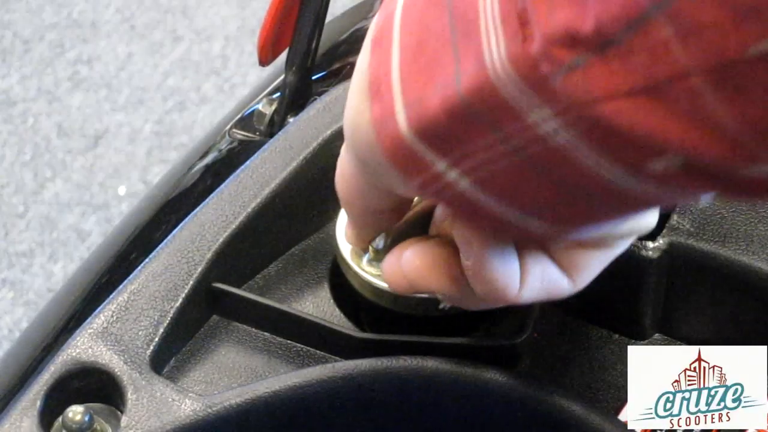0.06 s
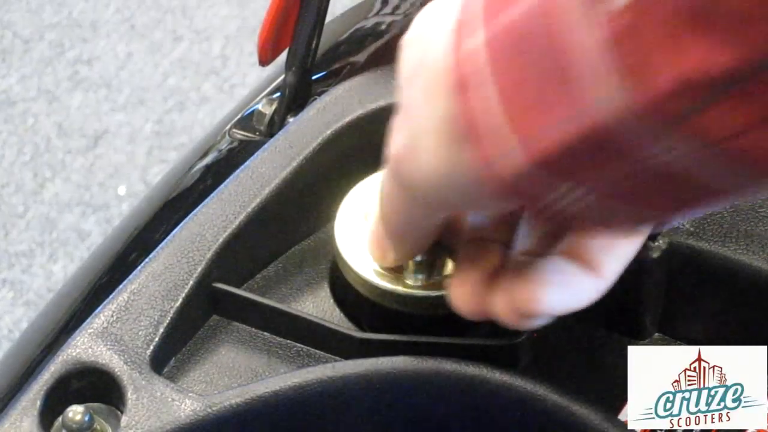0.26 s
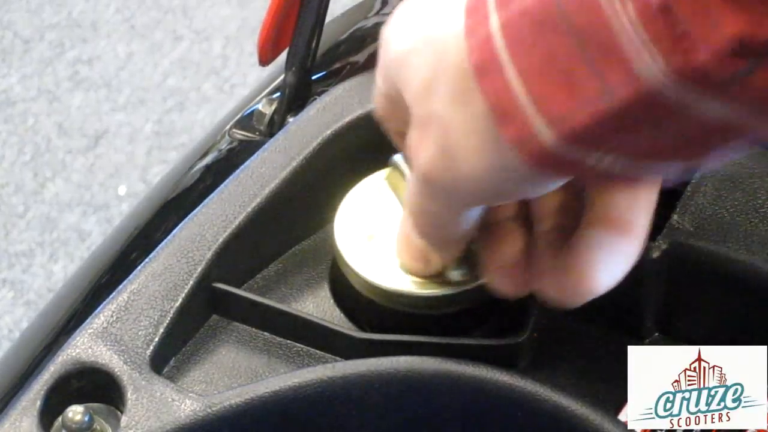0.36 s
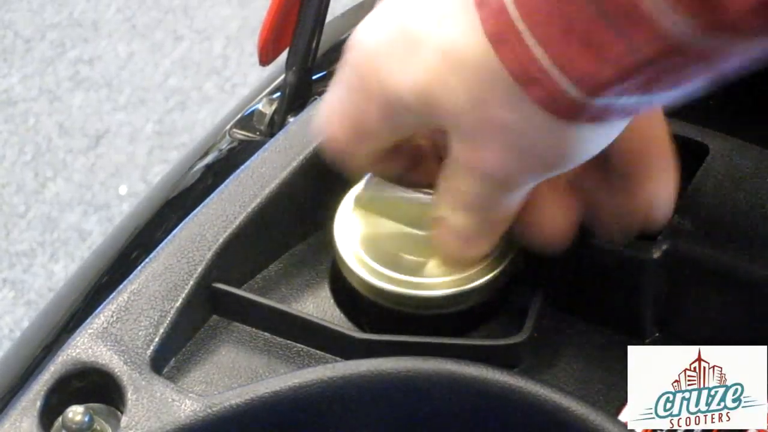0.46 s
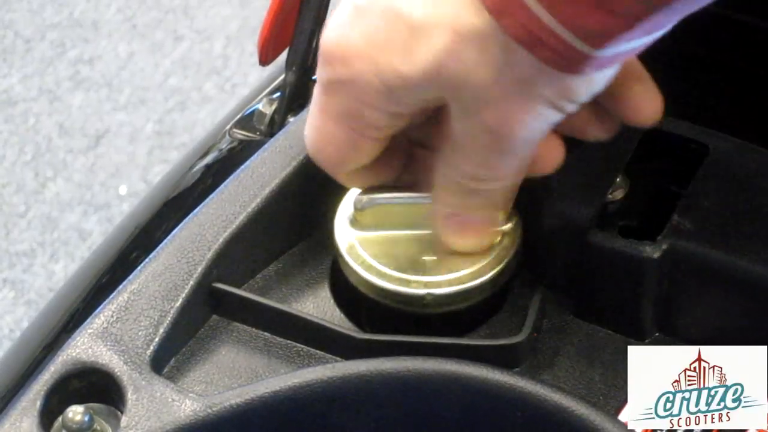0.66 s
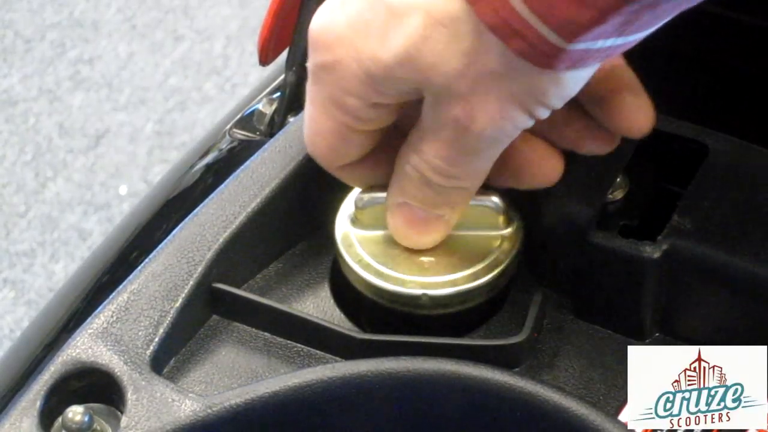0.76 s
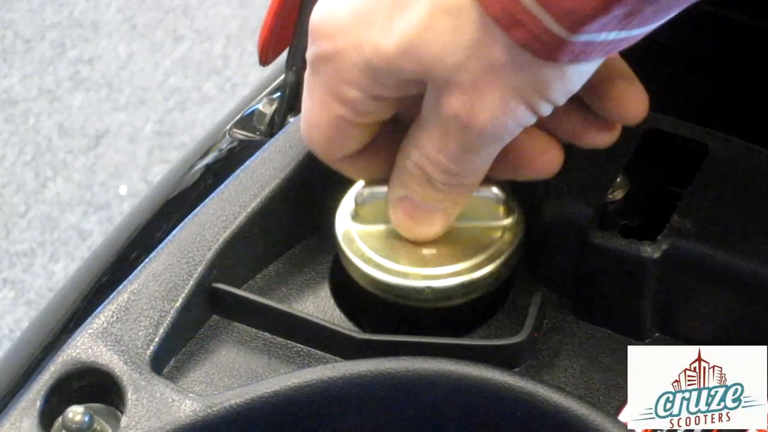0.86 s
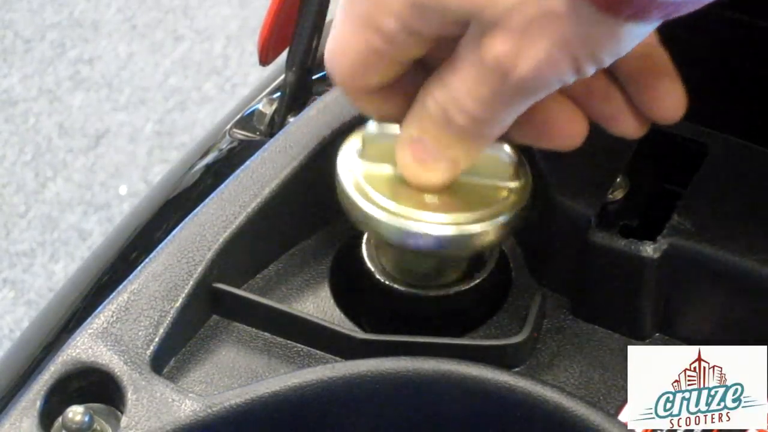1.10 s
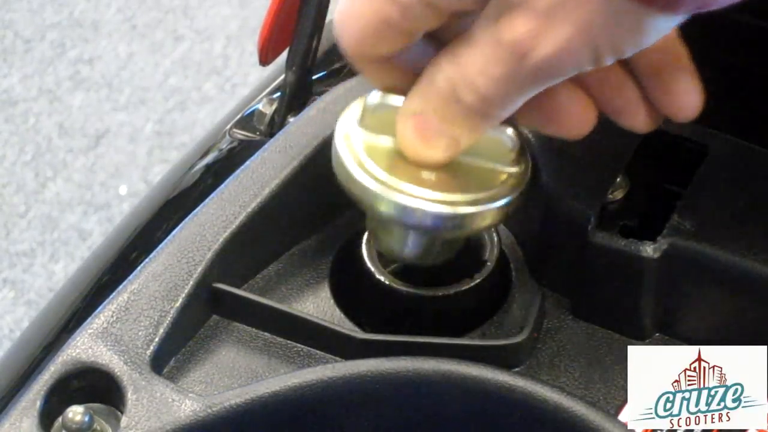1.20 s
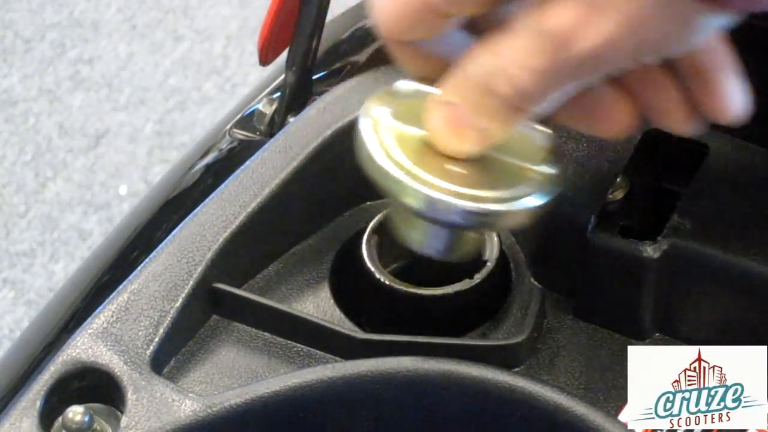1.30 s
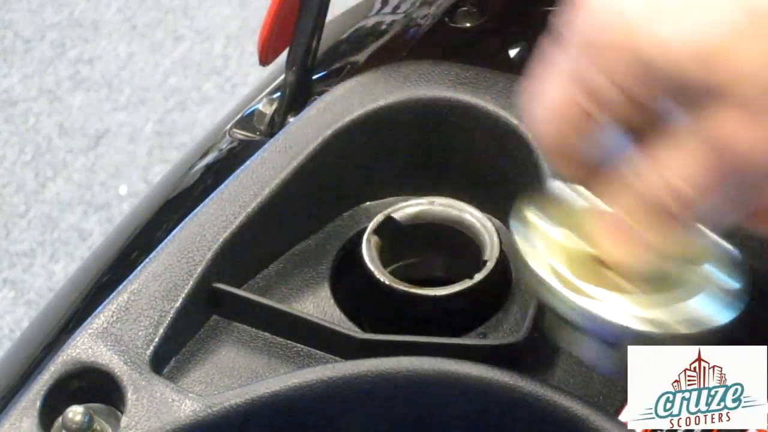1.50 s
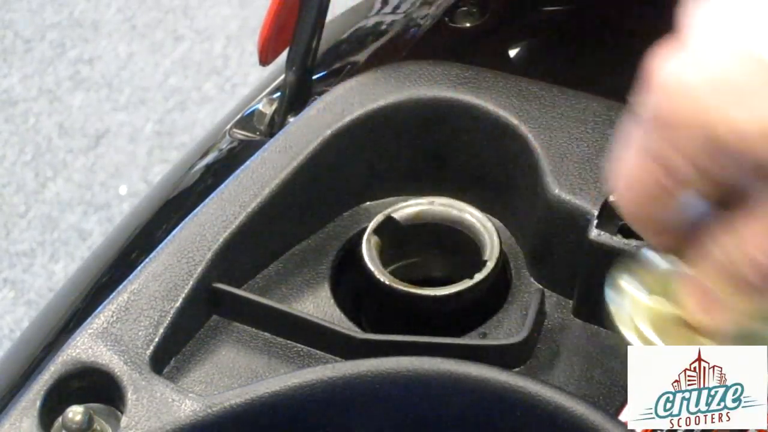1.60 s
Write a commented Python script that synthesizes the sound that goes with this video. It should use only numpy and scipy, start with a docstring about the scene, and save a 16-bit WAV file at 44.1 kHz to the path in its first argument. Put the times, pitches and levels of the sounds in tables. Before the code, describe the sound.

Faint finger rubbing, then hard metallic clicks and grinding from a twisted fuel cap with hollow tank thuds, a brief puff of air, and a ringing scrape as the cap lifts out, heard close over soft room air.

```python
"""Fingers rub faintly on a scooter's fuel cap, close to the microphone, over steady ventilation in a small room.
Then the metal cap is twisted: its lugs snap, chatter and grind round the filler neck and knock the hollow tank.
The seal lets go with a short hiss, and the cap scrapes up out of the neck, ringing more freely as it comes clear.
Blows ring sets of decaying modes or coloured noise bursts; rubbing is a stream of tiny random slips through
filters and resonances."""
import sys
import numpy as np
from scipy import signal
from scipy.fft import next_fast_len
from scipy.io import wavfile

SR = 44100
rng = np.random.default_rng(int(sys.argv[2]) if len(sys.argv) > 2 else 0)


def store_wav(level_fs):
    """Save 16-bit WAV to argv[1]."""
    pcm = np.round(np.clip(np.atleast_2d(level_fs), -1, 1) * 32767)
    wavfile.write(sys.argv[1], SR, pcm.T.astype(np.int16))


N = 72765
SECONDS = np.arange(N) / SR  # the whole scene
T = np.arange(SR // 2) / SR  # half a second, for one blow or response
IMPULSE = signal.unit_impulse(len(T))

# Modes of the hollow tank. Each row: frequency in Hz, relative level in dB, 60 dB decay time in seconds.
TANK_MODES = [(283, -9, .085), (303, -12, .07), (406, 0, .08), (522, -16, .08), (600, -6, .08),
              (895, -19, .1), (1074, -22, .12)]
# Spectrum of a hard metal crack. Each row: frequency in Hz, relative density in dB per Hz.
CRACK_SPECTRUM = [(200, -34), (2000, -12.5), (3000, -4.5), (4100, -0.5), (6000, -3), (9800, -6),
                  (13000, -13), (16000, -38)]
# Spectrum of dry rubbing on the cap. Each row: frequency in Hz, relative density in dB per Hz.
RASP_SPECTRUM = [(100, -38), (400, 7.5), (1200, -6.5), (2800, -6), (4300, 2), (7000, -4), (13300, -6.5),
                 (16000, -45)]

CRACK_T60_S = 0.015
TANK_GROUPS_HZ = (295, 400, 600)  # centres of the low, middle and upper modes
TANK_SWELL_CYCLES = 5.8  # the swell's time constant, in cycles


def amp(db):
    """Decibels to gain."""
    return 10 ** (np.asarray(db) / 20)


def unit(x):
    """Scales to an energy of one."""
    return x / np.sqrt(np.sum(x ** 2) + 1e-20)


def read(points, hz):
    """Reads a table on a log-frequency axis."""
    f, value = np.transpose(points)
    return np.interp(np.log(hz + 1), np.log(f + 1), value)


def add(mix, s, sound):
    """Mixes a sound in at a time in seconds."""
    part = mix[round(s * SR):][:len(sound)]
    part += sound[:len(part)]


def colour(x, points, tilt=0):
    """Causal filter from a spectrum and a tilt in dB per octave; the result has unit energy."""
    size = next_fast_len(len(x) + 4096)
    hz = abs(np.fft.fftfreq(size, 1 / SR))
    gain_db = read(points, hz) + tilt * np.log2(np.clip(hz, 200, 12000))
    # the Hilbert transform of the log gain gives the minimum phase
    response = np.exp(np.conj(signal.hilbert(np.log(amp(gain_db)))))
    return unit(np.fft.ifft(np.fft.fft(x, size) * response).real[:len(x)])


def through(x, response):
    """Plays a signal through a response."""
    return signal.fftconvolve(x, response)[:N]


def fade(t60):
    """Exponential decay that falls 60 dB in t60 seconds."""
    return np.exp(-np.log(1000) * T / t60)


def burst(t60):
    """Decaying noise: a thicket of modes too dense to tell apart."""
    return rng.standard_normal(len(T)) * fade(t60)


def ring(modes, rise_s, tilt=0):
    """The modes of one object after a blow, at unit energy; tilt is in dB per octave."""
    tone = np.zeros(len(T))
    for hz, db, t60 in modes:
        tone += amp(db + tilt * np.log2(hz)) * fade(t60) * np.sin(2 * np.pi * hz * T)
    return unit(tone * (1 - np.exp(-T / rise_s)))


def resonate(x, hz, width_hz):
    """A resonance that follows a pitch curve and keeps the power of a white input."""
    turn = np.exp(2j * np.pi * np.cumsum(hz * np.ones(N)) / SR)
    r = np.exp(-np.pi * width_hz / SR)
    # shift the pitch down to zero, smooth there, and shift back up
    smooth = signal.lfilter([np.sqrt(2 * (1 - r * r))], [1, -r], x / turn)
    return (turn * smooth).real


def drift(span_s):
    """Smooth random wandering of unit power."""
    kernel = T * np.exp(-2 * T / span_s)
    return unit(through(rng.standard_normal(N), kernel)) * np.sqrt(N)


def friction(times, level_db):
    """Rubbing as tiny slips of random size, in clumps, under a level curve."""
    grains_per_s, grain_spread_db = 3600, 4
    clump_s, clump_db = 0.0033, 3
    signs = rng.choice([-1, 1], N)
    struck = rng.random(N) < grains_per_s / SR
    sizes = amp(grain_spread_db * np.minimum(rng.exponential(1, N), 4))
    clumps = amp(clump_db * np.clip(drift(clump_s), -2, 2))
    level = np.interp(SECONDS, times, amp(level_db), left=0, right=0)
    return unit(signs * struck * sizes * clumps) * np.sqrt(N) * level


def small(x):
    """Small metal parts radiate almost no bass."""
    return signal.sosfilt(signal.butter(2, 340, "high", fs=SR, output="sos"), x)


def air():
    """Steady ventilation noise."""
    # Spectrum of the ventilation. Each row: frequency in Hz, relative density in dB per Hz.
    air_spectrum = [(20, -3), (110, 0), (450, -3.5), (1900, -5.5), (5000, -14), (5550, -5), (6200, -17),
                    (10500, -14.5), (16000, -35)]
    level_db = -50
    return amp(level_db) * np.sqrt(N) * colour(rng.standard_normal(N), air_spectrum)


def grip():
    """Fingers rub faintly on the cap as they take hold: slips coloured by the rasp."""
    # Strength of the rub. Each row: time in seconds, level in dB.
    grip_curve = [(0, -49.5), (.06, -48.5), (.13, -83)]
    return small(through(friction(*np.transpose(grip_curve)), colour(IMPULSE, RASP_SPECTRUM)))


def ping(hz):
    """The quickly damped note of the point of contact."""
    return unit(fade(0.013) * np.sin(2 * np.pi * hz * T))


def lugs():
    """Each strike is a crack and a ping with the ring of the cap; the loose locking plate only ticks."""
    # Lugs striking the neck. Each row: start in seconds, strike level in dB, ping in Hz,
    # ping level in dB relative to the crack.
    clicks = [(0.2119, 7.5, 4130, 0), (0.4165, 6.5, 5140, -0.5), (0.421, 0.5, 6500, 4),
              (0.4327, 4, 5400, 1), (0.44, 5.5, 4530, -5), (0.51, -2.5, 6320, -3), (0.515, 0.5, 3800, -1),
              (0.5205, 6, 4260, -2), (0.526, 4, 4200, -13), (0.529, 5.5, 7740, 0), (0.5304, 3.5, 6330, -1),
              (0.5667, -5.5, 5300, -1), (0.568, -4.5, 8200, 7.5), (0.5994, -1, 7890, -7.5),
              (0.6015, 1.5, 4780, 2), (0.817, -12, 3880, -10), (1.0021, -14.5, 8300, 3.5)]
    # Light ticks of the locking plate. Each row: start in seconds, tick level in dB, ping in Hz,
    # ping level in dB relative to the tick's noise.
    plate_ticks = [(0.6338, -18, 2680, 0), (0.7097, -19.5, 2660, -0.5), (0.761, -12.5, 2416, 2.5),
                   (0.917, -16.5, 4420, -14), (0.9226, -17.5, 6100, -12), (0.9337, -20, 4000, -9)]
    # Modes of the seated cap. Each row: frequency in Hz, relative level in dB, 60 dB decay time in seconds.
    seated_modes = [(3720, -1, 0.062), (4205, 4, 0.047), (4630, -3.5, 0.056), (4890, 5.5, 0.022),
                    (5590, -7, .05), (6400, -13, 0.05), (7880, 0.5, 0.028), (8505, 0.5, 0.07)]
    # Spectrum of a tick. Each row: frequency in Hz, relative density in dB per Hz.
    tick_spectrum = [(300, -21), (1700, -20), (2400, 7), (3800, 2), (9000, -8.5), (16000, -32)]
    ring_db, ring_rise_s, tick_t60_s = -2.5, 0.00063, 0.0072
    out = np.zeros(N)
    for s, db, hz, ping_db in clicks:
        tilt = 6.5 * np.log2(hz / 5500)  # a higher ping brightens the crack and the ring
        strike = colour(burst(CRACK_T60_S), CRACK_SPECTRUM, tilt)
        strike += amp(ping_db) * ping(hz)
        strike += amp(ring_db) * ring(seated_modes, ring_rise_s, tilt)
        add(out, s, amp(db) * strike)
    for s, db, hz, ping_db in plate_ticks:
        tick = colour(burst(tick_t60_s), tick_spectrum) + amp(ping_db) * ping(hz)
        add(out, s, amp(db) * tick)
    return out


def clatter():
    """The panels round the tank, as a noise burst with a soft onset."""
    # Spectrum of the panels. Each row: frequency in Hz, relative density in dB per Hz.
    panel_spectrum = [(40, -30), (100, -10.5), (160, 1), (250, -6.5), (800, 2), (2400, -6.5), (4000, -25),
                      (16000, -73)]
    rise_s, t60_s = 0.0019, 0.14
    return colour(burst(t60_s) * (1 - np.exp(-T / rise_s)), panel_spectrum)


def knocks():
    """Each blow shares itself differently among the tank's three groups of modes; the low ones swell slowest."""
    # Blows that reach the tank. Each row: start in seconds, then levels in dB of the low modes,
    # the middle modes, the upper modes and the clatter of the panels.
    blows = [(.213, -16.5, -0.5, -2, -4.5), (.229, -8, 5, -8.5, -8.5), (.413, -12, -3.5, -21, -13),
             (.518, -7, -0.5, -20, -8), (.566, -12, 3.5, -6, -9.5), (.599, -1.5, 8.5, 4, 4.5),
             (0.817, -3.5, 3, -12, -11), (.987, -12.5, 1, -11.5, -18), (1.003, -2, 6, -23, -8),
             (1.071, -2, -11, -10, -5.5)]
    groups = []
    for centre in TANK_GROUPS_HZ:
        # every mode belongs to the nearest centre
        modes = [m for m in TANK_MODES if min(TANK_GROUPS_HZ, key=lambda f: abs(f - m[0])) == centre]
        groups.append(ring(modes, TANK_SWELL_CYCLES / centre))
    out = np.zeros(N)
    for s, *groups_db, clatter_db in blows:
        add(out, s, amp(groups_db) @ groups + amp(clatter_db) * clatter())
    return out


def tank_response(tilt, clatter_db):
    """The whole tank and its panels, as rubbing stirs them, at unit energy."""
    body = ring(TANK_MODES, TANK_SWELL_CYCLES / np.mean(TANK_GROUPS_HZ), tilt)
    return unit(body + amp(clatter_db) * clatter())


def twist():
    """The lugs grind along their ramps, rasping on the neck and stirring the tank."""
    # Lugs grinding round the neck. Each row: time in seconds, rasp level in dB, tank rumble level in dB.
    grind_curve = [(0.239, -39, -66), (.28, -47.5, -46), (.32, -54, -61), (0.396, -55, -49.5),
                   (.45, -34, -38), (.55, -33.5, -35.5), (.59, -30.5, -27.5), (0.623, -47, -48),
                   (0.668, -52.5, -47), (0.751, -75, -73), (0.801, -67, -37)]
    s, rasp_db, tank_db = np.transpose(grind_curve)
    rasp = through(friction(s, rasp_db), colour(IMPULSE, CRACK_SPECTRUM, tilt=-4.8))
    tank = through(friction(s, tank_db), tank_response(tilt=0, clatter_db=1.0))
    return rasp + tank


def seal():
    """Tank pressure escapes in one short puff of noise as the seal lifts."""
    # Spectrum of the hiss. Each row: frequency in Hz, relative density in dB per Hz.
    hiss_spectrum = [(1000, -14), (3500, -3), (5000, 1.5), (7500, 0.5), (8700, 7), (12500, 2), (16000, -19)]
    start_s, level_db, rise_s, t60_s = 0.781, -9.5, 0.00466, 0.097
    puff = burst(t60_s) * (1 - np.exp(-T / rise_s))
    out = np.zeros(N)
    add(out, start_s, amp(level_db) * colour(puff, hiss_spectrum))
    return out


def free_cap(scrape):
    """Scraping and catches ring the cap, whose modes waver in the neck and settle lower as it comes clear."""
    # Modes of the freed cap. Each row: frequency in Hz, response to scraping in dB, 60 dB decay time in seconds.
    free_modes = [(1380, -14, 0.65), (1781, -3, 0.26), (1873, -4, 0.11), (2185, -19, .22),
                  (4075, -2.5, 0.098), (4200, 0, 0.017), (5940, -8.5, 0.053), (6350, -20, 0.11),
                  (11300, -19, .03)]
    # The barrel catching on the rim. Each row: start in seconds, level in dB, frequency in Hz of favoured modes.
    catches = [(1.075, 0, 1670), (1.106, -11, 5940), (1.12, -12, 4030), (1.152, -8, 1750),
               (1.163, -15.5, 5940), (1.196, -9, 2180), (1.201, -11, 4075)]
    clear_s = (1.16, 1.205)  # start and end of coming clear
    seated_sharp, wobble, wobble_s = 0.02, 0.004, 0.02  # first two as fractions of the pitch
    fall_db_per_octave, crack_db = 31, -15.5
    held = np.interp(SECONDS, clear_s, (1, 0))
    out = np.zeros(N)
    for hz, db, t60 in free_modes:
        drive = amp(db) * scrape
        for s, catch_db, catch_hz in catches:
            octaves = abs(np.log2(hz / catch_hz))
            add(drive, s, amp([catch_db - fall_db_per_octave * octaves]))  # one sharp impulse
        pitch = hz * (1 + held * (seated_sharp + wobble * drift(wobble_s)))
        out += resonate(drive, pitch, np.log(1000) / np.pi / t60)
    for s, catch_db, _ in catches:
        add(out, s, amp(catch_db + crack_db) * colour(burst(CRACK_T60_S), RASP_SPECTRUM))
    return out


def pull():
    """The barrel squeaks and scrapes up the neck: the tank fades as the cap's ring and the opening neck take over."""
    # The barrel sliding out. Each row: time in seconds, then levels in dB of the rasp, the tank rumble
    # and the scraping that rings the freed cap.
    slide_curve = [(0.928, -60, -46, -62), (.98, -57, -46.5, -57), (1.007, -32, -39, -45.5),
                   (1.037, -55, -28, -47.5), (1.079, -40.5, -42.5, -39.5), (1.135, -39, -38.5, -38.5),
                   (1.192, -32.5, -52.5, -38.5), (1.208, -44, -55, -48.5), (1.25, -71, -62, -55)]
    neck_opens_s, neck_hz, neck_width_hz, neck_db = (1.098, 1.214), (533, 599), 27, 0.5
    squeak_s, squeak_db = (0.94, 1.12), (-49.65, -60)  # sudden start, then dying away
    squeak_hz, squeak_width_hz = 8280, 85
    s, rasp_db, tank_db, ring_db = np.transpose(slide_curve)
    rasp = through(friction(s, rasp_db), colour(IMPULSE, RASP_SPECTRUM))
    tank = through(friction(s, tank_db), tank_response(tilt=-0.54, clatter_db=-6.5))
    cap = free_cap(friction(s, ring_db))
    # air in the neck, rising in pitch as it opens
    neck_pitch = np.interp(SECONDS, neck_opens_s, neck_hz)
    neck = resonate(friction(s, ring_db + neck_db), neck_pitch, neck_width_hz)
    squeak = resonate(friction(squeak_s, squeak_db), squeak_hz, squeak_width_hz)
    return small(rasp + cap + squeak) + tank + neck


def room(x):
    """Quick reflections from the plastic well round the neck, then the faint tail of the room."""
    # Decay of the room. Each row: frequency in Hz, 60 dB decay time in seconds.
    room_decay = [(100, 0.92), (500, 0.31), (2000, 0.3), (6000, 0.1), (16000, 0.2)]
    near_db, near_t60_s, near_delay_s = -8, 0.03, 0.002
    room_db, room_delay_s = -14, 0.0064
    hz, t, z = signal.stft(rng.standard_normal(len(T)), SR, nperseg=256)
    decay = np.exp(-np.log(1000) * t / read(room_decay, hz)[:, None])
    tail = signal.istft(z * decay, SR, nperseg=256)[1][:len(T)]
    near = unit(burst(near_t60_s) * (T > near_delay_s))
    far = unit(tail * (T > room_delay_s))
    return through(x, amp(near_db) * near + amp(room_db) * far)


def scene():
    """The cap and the tank in the room, over the ventilation."""
    direct = grip() + small(lugs()) + knocks() + twist() + seal() + pull()
    return (direct + room(direct) + air())[None]


def record(dry):
    """The recorder rounds off the highest peaks, then limits the band."""
    headroom, edge_hz = 0.9, 15900  # headroom as a fraction of full scale
    held = dry / (1 + (dry / headroom) ** 4) ** 0.25
    lowpass = signal.firwin(511, edge_hz, window=("kaiser", 9), fs=SR)
    return signal.oaconvolve(held, lowpass[None], "same")


dry = scene()
out = record(dry)
store_wav(out)
```